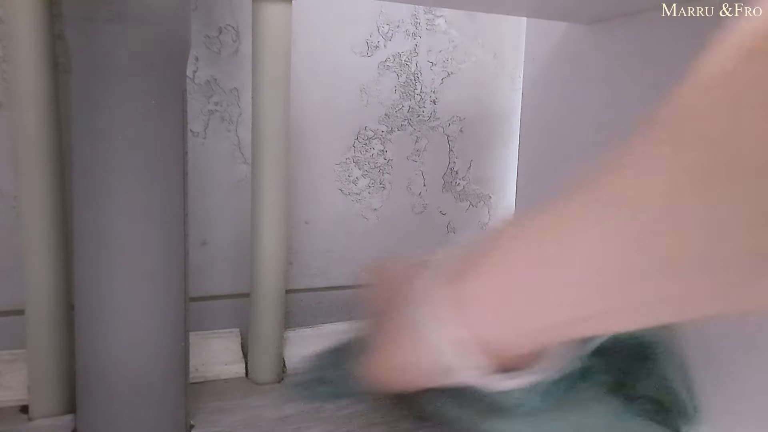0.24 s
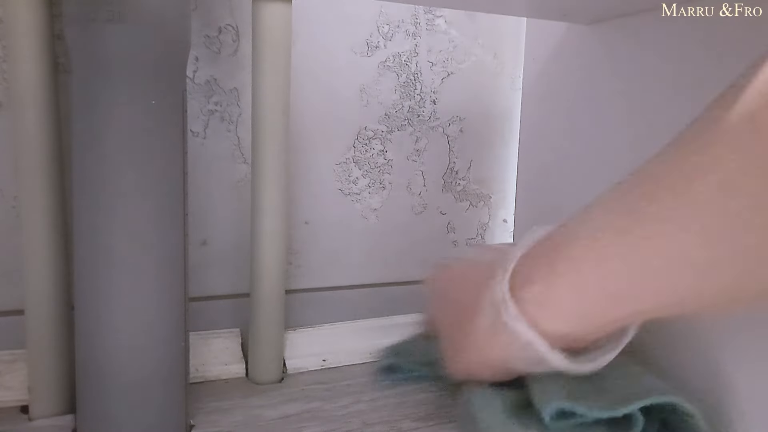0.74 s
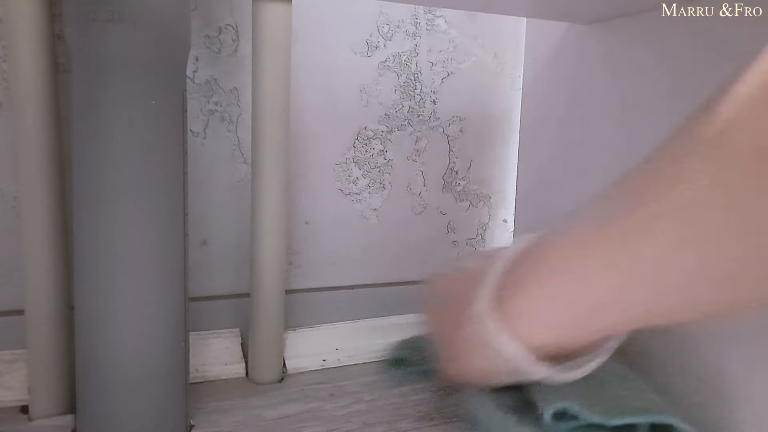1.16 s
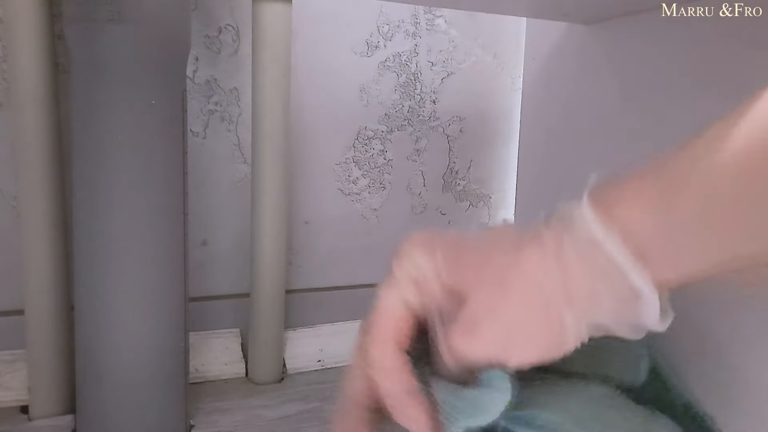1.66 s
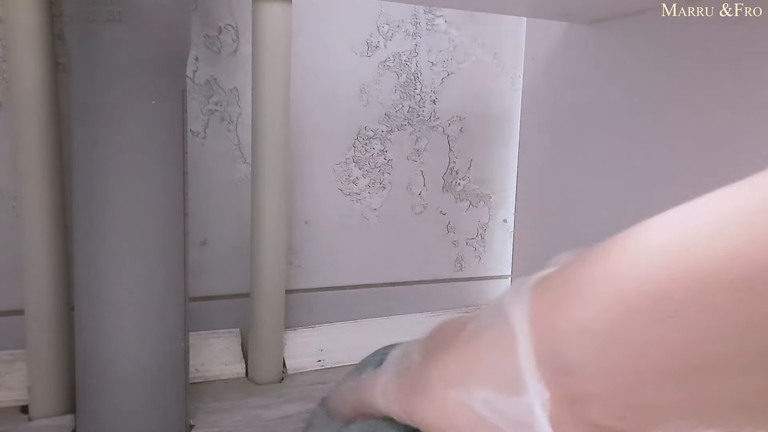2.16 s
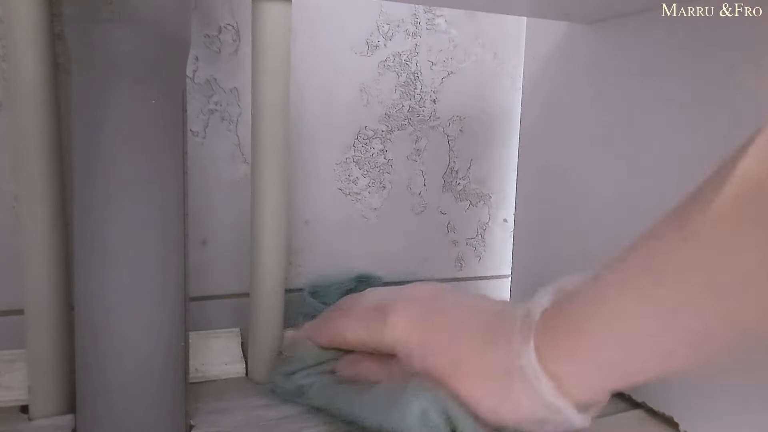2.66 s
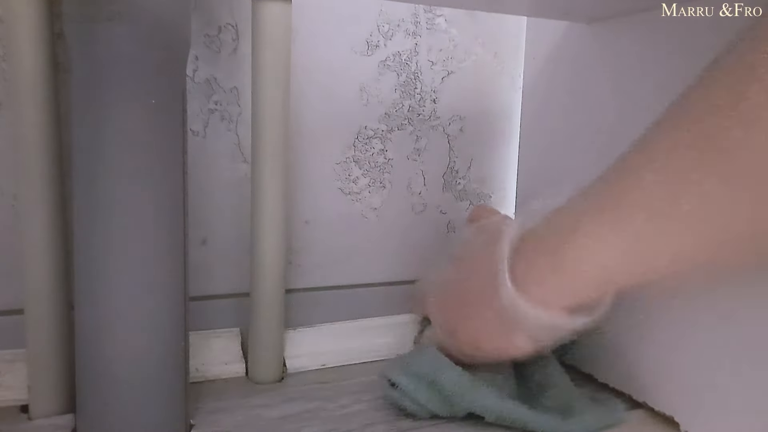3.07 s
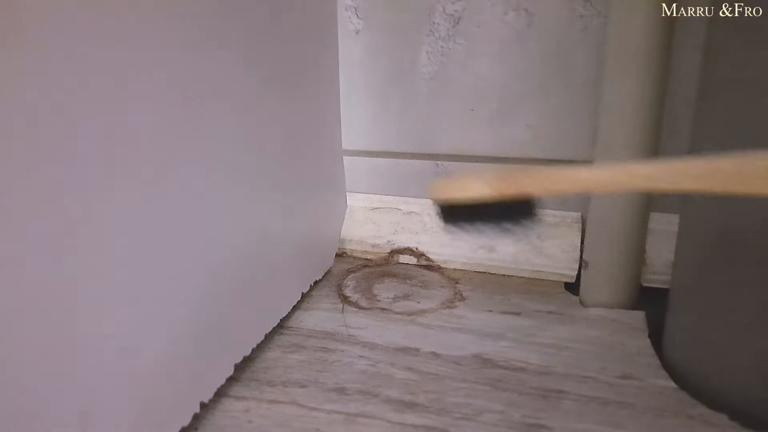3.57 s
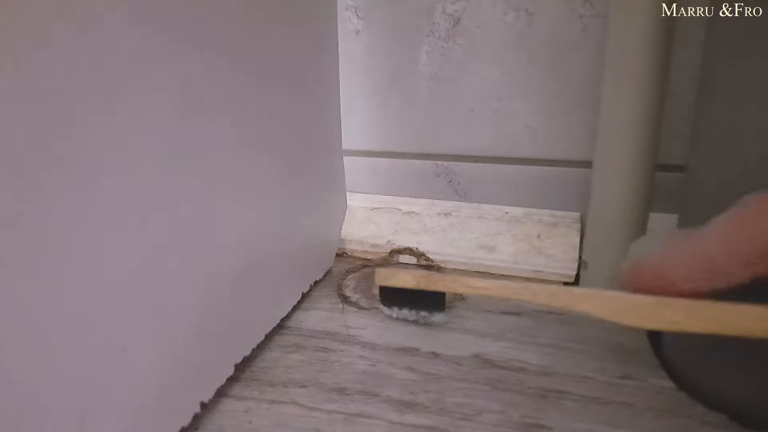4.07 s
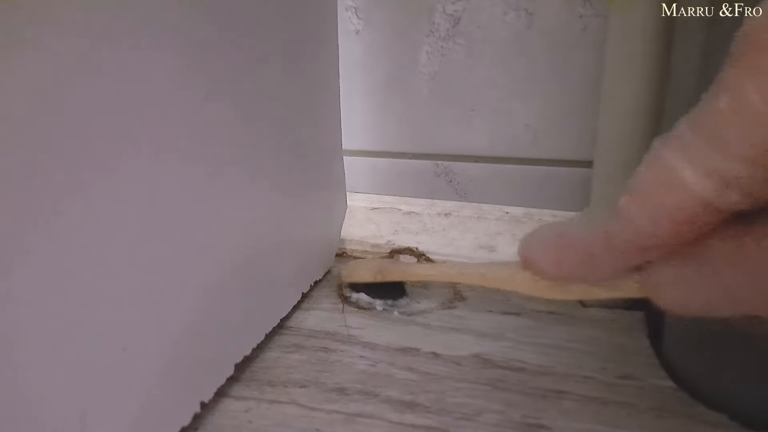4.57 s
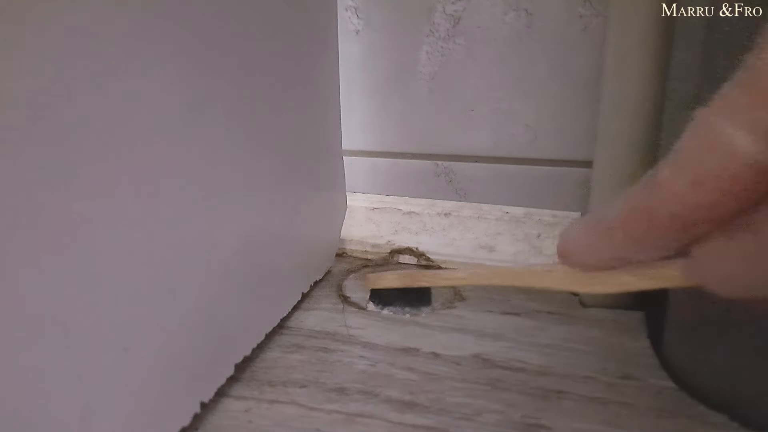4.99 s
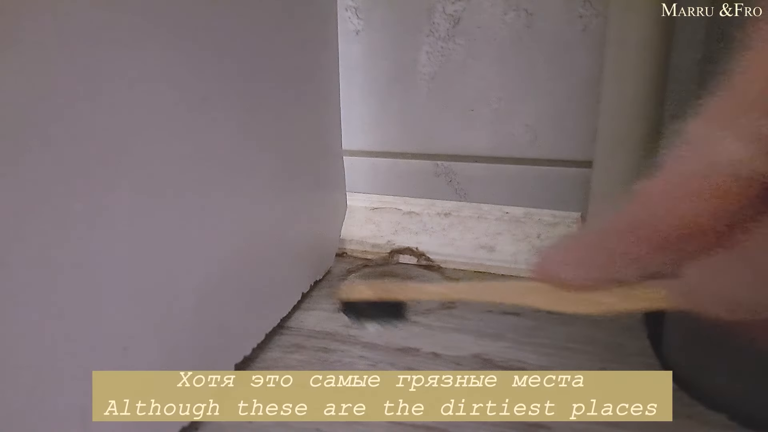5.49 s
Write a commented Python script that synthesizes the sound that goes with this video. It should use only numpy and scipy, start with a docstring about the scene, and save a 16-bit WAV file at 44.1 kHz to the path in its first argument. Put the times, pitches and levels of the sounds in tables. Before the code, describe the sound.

A cloth rubs the floor in uneven strokes with hollow board thumps, then a small brush scrubs scratchily, faster and harder.

```python
"""Friction and impact on a bathroom floor

A gloved hand wipes the floor with a cloth in a narrow corner and bumps the hollow boards.
After an abrupt change of scene a toothbrush settles on the grime at the floor's edge and scrubs, faster and harder.
Friction is random tiny slips of fibres and bristles, coloured by filters or exciting resonances of the floor.
Blows ring decaying board modes over a dull thud; short echoes from close walls scatter the treble."""
import sys
import numpy as np
from scipy import signal
from scipy.fft import rfft, irfft, next_fast_len
from scipy.io import wavfile
from scipy.ndimage import uniform_filter1d, map_coordinates

SR = 44100
rng = np.random.default_rng(int(sys.argv[2]) if len(sys.argv) > 2 else 0)


def unload_wav(signal):
    """Save mono or channel-first audio to the path in sys.argv[1] as 16-bit WAV at rate SR, clipped to [-1, 1]."""
    wavfile.write(
        sys.argv[1],
        SR,
        np.round(np.clip(np.atleast_2d(signal).T, -1, 1) * 32767).astype(np.int16),
    )


N = 252693  # length in samples
# Zero-padded transform length in samples, and its frequencies in Hz
SIZE = next_fast_len(N + SR // 4, real=True)
HZ = np.fft.rfftfreq(SIZE, 1 / SR)

# All levels in the tables are relative: each layer is balanced again where it is mixed.
# Noise of the quiet room. Each row: frequency in Hz, spectral level in dB per Hz.
ROOM_SPECTRUM = [(25, 0), (80, 0), (220, -4), (330, 2), (560, -3), (900, -14), (1500, -14), (2800, -20),
                 (8000, -17), (9300, -22), (15000, -17)]
# Likeness of the two ears. Each row: frequency in Hz, correlation from 0 to 1.
EAR_LIKENESS = [(150, 0.92), (380, 0.82), (700, 0.44), (1400, 0.4), (3000, 0.015), (12000, 0.0215)]
# Lean of the friction treble, mostly left. Each row: frequency in Hz, left-right difference in dB.
TREBLE_LEAN = [(1500, 1), (4000, 2), (7000, -1), (9500, 5.5), (15000, 2.5)]

# Bumps on the boards. Each row: start in seconds, blow in dB, boom in dB, knock in dB, rise in seconds.
BUMP_EVENTS = [(0.142, -16, -18.5, -9, 0.0026), (0.252, -25.5, -15, -4, 0.0056),
               (0.395, -24.5, -16, -11.5, 0.0033), (0.526, -9, -12, -13, 0.0033),
               (0.959, -2, -10, -13, 0.001), (1.425, -13, -12, -5.5, 0.021), (1.575, -20.5, -14, -18, .002),
               (1.787, -12, -12.5, -1, 0.013), (2.2, -27.5, -5, -1, .008), (2.422, -24, -18, -2, 0.0031),
               (2.51, -22.5, -8.5, -17, 0.0038), (2.792, -27.5, -5, -10, 0.0058),
               (2.85, -17, -7.5, -11.5, 0.0045), (3.114, -17.5, -31, -6, .004),
               (3.145, -18.5, -10, -18, 0.007), (3.579, -38, -33, -25, .002), (3.888, -26, -14, -8, 0.0056),
               (3.943, -31, -7, -12, 0.0044), (4.237, -19, -28, -13, 0.022), (4.755, -10, -17, -16, 0.0011)]
# Modes of the hollow boards. Each row: frequency in Hz, level in dB, undamped 60 dB decay in seconds.
BOARD_MODES = [(77.2, -23.5, 0.72), (123.6, -1.5, 0.46), (167.1, 1.5, 0.26), (192.2, -5, 0.17),
               (292, -7.5, 0.075), (329, -17.5, 0.068), (374.6, 3, 0.21), (428, -17, 0.084),
               (488.6, -12.5, 0.16), (559, -19, 0.079), (726, -21, 0.16), (1050, -37, 0.17)]
# Dull push of a padded blow. Each row: frequency in Hz, spectral level in dB per Hz.
THUD_SPECTRUM = [(20, -13), (55, -12), (110, 2), (250, -5), (480, -0.5), (750, -21.5), (1500, -49),
                 (4000, -64)]
# Sharp snaps of glove and grit. Each row: start in seconds, crack in dB, clack relative to the crack in dB.
SNAP_EVENTS = [(0.1407, -21.5, -5), (0.2515, -26, 0), (0.9226, -37.5, 18.5), (0.9605, -26, 9),
               (1.5774, -37, 9.5), (1.7744, -17.5, -26), (2.499, -22.5, -26), (2.823, -30, 16.5),
               (2.845, -17, 0.5), (3.6403, -52, -9.5)]
# Rakes of fibres or bristles over a crust of grime.
# Each row: centre in seconds, half length in seconds, centre frequency in Hz, level in dB.
RAKE_EVENTS = [(1.582, 0.025, 13400, -42), (2.269, 0.014, 5800, -38.5), (2.449, 0.081, 5700, -42.5),
               (2.505, 0.023, 13400, -31), (4.362, 0.032, 11700, -32), (4.727, 0.03, 3080, -40),
               (5.036, 0.024, 4000, -45)]

# Strokes of the cloth. Each row: start in seconds, hardest push in seconds, end in seconds,
# fibre hiss in dB, drag on the floor in dB, rasp on the skirting in dB.
WIPE_STROKES = [(0.008, 0.086, 0.29, -49.5, -45, -42.5), (0.065, 0.173, 0.36, -42.5, -40.5, -37),
                (0.409, 0.523, 0.61, -43.5, -38.5, -30.5), (0.612, 0.741, 0.9, -47.5, -50, -43),
                (0.89, 0.938, 1.05, -45, -42, -30), (0.987, 1.135, 1.278, -44, -42.5, -38),
                (1.294, 1.482, 1.6, -49.5, -46, -64), (1.5, 1.596, 1.71, -55, -51.5, -49.5),
                (1.702, 1.805, 1.94, -46.5, -52, -41), (1.758, 1.869, 2.18, -54, -57.5, -45),
                (1.922, 2.09, 2.39, -46.5, -56, -53), (2.067, 2.195, 2.4, -47, -44, -58),
                (2.314, 2.537, 2.68, -48, -44, -48.5), (2.586, 2.766, 3.18, -52, -71, -52.5),
                (2.771, 2.827, 2.924, -45, -45, -30), (2.886, 2.99, 3.2, -55, -52.5, -64),
                (3.052, 3.104, 3.22, -40, -45.5, -31.5)]
# Pulls of the bunched cloth under the palm. Each row: start in seconds, hardest pull in seconds,
# end in seconds, level in dB, pitch ratio.
CLOTH_PULLS = [(1.64, 1.82, 2.2, -39, 1.04), (1.874, 2.067, 2.3, -48, 0.99), (2.1, 2.21, 2.28, -52.5, 0.8),
               (3.048, 3.127, 3.2, -24, 0.92)]
# Strokes of the toothbrush, each lasting until the next turn. Each row: turn in seconds,
# hardest press as a share of the stroke, bristle hiss in dB, drag on the floor in dB.
BRUSH_STROKES = [(3.87, 0.43, -56.5, -45.5), (3.978, 0.45, -50.5, -41.5), (4.207, 0.65, -43, -38.5),
                 (4.497, 0.65, -52, -38), (4.62, 0.42, -44, -36), (4.781, 0.71, -46, -32),
                 (4.935, 0.4, -46.5, -38), (5.075, 0.67, -45, -29.5), (5.226, 0.75, -43, -30),
                 (5.361, 0.59, -43.5, -29.5), (5.504, 0.75, -44.5, -32.5), (5.641, 0.68, -43, -30)]
# Hiss that remains even at a turn, most while the brush settles.
# Each row: time in seconds, share of the stroke's hiss gain that is added.
TURN_HISS = [(4.2, 0.27), (4.5, 0.058)]

# Colours of the friction noise. Each row: frequency in Hz, spectral level in dB per Hz.
FIBRE_SPECTRUM = [(200, -18), (700, -4), (1500, -2.5), (2900, -2.5), (5500, 2), (8300, 4), (9200, -8),
                  (12500, 1), (15800, -5)]
BRISTLE_SPECTRUM = [(300, -12), (900, -12), (2000, -3.5), (3500, -1), (6000, -0.5), (8200, 3.5), (9200, -9),
                    (12500, -2), (15800, -7.5)]

# Resonances under a sliding load: floor under cloth, brush and bearing hand, skirting, bunched cloth
# (before its pitch ratio), brush head.
# Each row: frequency in Hz, width in Hz, level in dB, left-right difference in dB.
CLOTH_FLOOR_MODES = [(78, 29, -14, 4), (126.5, 25, -5.5, 0), (167.4, 20.3, 0.5, 0.5), (305, 52, -9.5, 8),
                     (347.5, 65, -5, 2.5), (497, 86, -11, 12.5), (561, 200, -14, 7.5)]
BRUSH_FLOOR_MODES = [(160, 15.7, 0, -1.7), (197.5, 20, -6.5, 6), (267, 38.5, -4, -1.5),
                     (335.3, 36.6, 3, -1), (362.6, 44.6, 1, 1.7)]
HAND_FLOOR_MODES = [(76, 9, 4, 1), (126, 20, -6, 1), (185, 50, -9, 0), (260, 50, -12, 0)]
SKIRTING_MODES = [(467, 206, -7.5, 5.5), (706, 89, -8, -5), (891, 98, -2, 0.5), (1118, 63, -6.5, -13),
                  (1347, 81, 2, -4.5), (1872, 101, -4, 6.5), (2187, 180, -8, 5), (3840, 1000, -20.5, -9)]
BUNCH_MODES = [(449, 157, 0, 5.5), (534, 128, 3.5, 6.5), (638, 214, -8, 4.5)]
BRUSH_HEAD_MODES = [(554.8, 19.5, 2.5, 19.2), (625, 100, 1, 11), (736, 61, -2.5, 8.1), (783, 45, -2.5, 8.4),
                    (953, 120, -14, 0.9), (1135, 29, -11, 2.6), (1725, 234, -12.5, 2.7)]

# Growth of each sound with the push of the hand.
# Each row: loss at either end of a stroke in dB, roundness (1 pointed, 2 domed).
HISS_SHAPE = (16.1, 1.59)
DRAG_SHAPE = (17.6, 1.52)
RASP_SHAPE = (26.8, 1.186)
PULL_SHAPE = (27.5, 1.37)
PRESS_SHAPE = (13.4, 1.27)

HISS_POWER = 1.1  # exponent of bristle speed
SCENE_CHANGE_S, LAST_TURN_S = 3.24, 5.78
BEARING_S, BEARING_DB = 4.76, -27  # crest of the rumble under the brush hand
BEARING_RISE_DB_PER_S, BEARING_FALL_DB_PER_S = 260, 107
DAMPING_DB = 28.5  # a blow weaker by this much rings half as long, under a light hand on the boards
TOP_HZ = 16050  # upper band limit


def amp(db):
    """Level and amplitude: decibels become a linear gain."""
    return 10 ** (np.asarray(db) / 20)


def unit(x):
    """Normalisation: a signal is scaled to rms 1."""
    return x / np.sqrt(np.mean(x ** 2) + 1e-20)


def along(points, hz):
    """Interpolation: (Hz, value) points are read on a logarithmic frequency axis."""
    f, v = np.transpose(points)
    return np.interp(np.log(hz + 1), np.log(f + 1), v)


def pan(db):
    """Interaural level difference: it is shared equally between left and right gains."""
    return amp(np.array([[1], [-1]]) * db / 2)


def filtered(x, response):
    """Linear filtering: the spectrum is multiplied by a response of frequency."""
    return irfft(rfft(x, SIZE) * response(HZ), SIZE)[..., :N]


def coloured(x, spectrum):
    """Spectral shaping: friction noise receives its colour and its lean between the ears."""
    return filtered(x, lambda hz: amp(along(spectrum, hz)) * pan(along(TREBLE_LEAN, hz)))


def resonate(x, modes):
    """Modal response: parallel resonances of alternating polarity, each placed between the ears."""
    centre, width, db, side = np.transpose(modes)
    gains = (-1) ** np.arange(len(centre)) * amp(db) * pan(side)

    def response(hz):
        detuning = (hz * hz - centre[:, None] ** 2) / ((hz + 1e-6) * width[:, None])
        return gains @ (1 / (1 + 1j * detuning))

    return filtered(x, response)


def add(track, s, sound):
    """Superposition: a sound is summed into a track at time s in seconds."""
    start = round(s * SR)
    track[start:start + len(sound)] += sound[:N - start]


def ears(pair, lead_s=.00011):
    """Interaural coherence: bass is alike at both ears, left leading; treble differs between them."""
    turn = np.arccos(np.clip(along(EAR_LIKENESS, HZ), -1, 1)) / 2
    mid, side = rfft(pair, SIZE) * [np.cos(turn), np.sin(turn)]
    # half the lead advances the left ear, half delays the right
    lead = np.exp(1j * np.pi * HZ * lead_s)
    return irfft([(mid + side) * lead, (mid - side) / lead], SIZE)[:, :N]


def slips(rate, spread_db):
    """Stick-slip: random tiny slips, rate a second on average, of varying size, reach both ears."""
    happens = rng.random(N) < rate / SR
    sizes = happens * amp(spread_db * np.clip(rng.standard_normal(N), -2, 2))
    return unit(ears(sizes * rng.standard_normal((2, N))))


def catching(rate, depth_db):
    """Uneven grip: a smooth random gain passes rate knots a second."""
    knots = rng.standard_normal(int(N * rate / SR) + 4)
    wander = map_coordinates(knots, [np.arange(N) * rate / SR])
    return unit(amp(depth_db * wander))


def shifting(x, depth_db):
    """Changing contact: the colour of the friction drifts as the contact moves over new ground."""
    z = signal.stft(x, nperseg=512)[2]
    field = rng.standard_normal(z.shape)
    field = uniform_filter1d(field, size=5, axis=1)  # across frequency
    field = uniform_filter1d(field, size=12, axis=2)  # across time
    return signal.istft(z * amp(depth_db * unit(field)), nperseg=512)[1][:, :N]


def swell(start, crest, end, shape):
    """Envelope of a push: gain builds to its crest, eases off and dies away beyond both ends."""
    depth_db, roundness = shape
    t = np.arange(N) / SR
    before = (crest - t) / max(crest - start, .01)
    after = (t - crest) / max(end - crest, .01)
    away = np.maximum(before, after)  # 0 at the crest, 1 at either end
    near = away < 2
    gain = np.zeros(N)
    gain[near] = amp(-depth_db * away[near] ** roundness)
    return gain


def room_tone():
    """Stationary background: faint steady noise of the bathroom, shaped in frequency."""
    air = unit(filtered(ears(rng.standard_normal((2, N))), lambda hz: amp(along(ROOM_SPECTRUM, hz))))
    return amp(-61.5) * air


def corner(x, wall_db=-18, lowest_hz=700, count=7):
    """Early reflection: a few weak treble echoes from the close walls, different at each ear."""
    walls = np.zeros((2, SR // 50))
    for ear in walls:
        delays = rng.integers(SR // 1000, len(ear), count)  # 1 to 20 ms, in samples
        ear[delays] = amp(wall_db) * rng.choice([-1, 1], count)
    return filtered(x, lambda hz: 1 + rfft(walls, SIZE) * hz ** 2 / (hz ** 2 + lowest_hz ** 2))


def bumps(detune=0.058, thud_t60=0.17):
    """Modal impact: soft blows thud and ring the boards; the contact weighs deep boom against knock."""
    track, pushes, t = np.zeros(N), np.zeros(N), np.arange(SR // 2) / SR
    hz, db, t60 = np.transpose(BOARD_MODES)[:, :, None]
    polarity = (-1) ** np.arange(len(hz))[:, None]
    for s, peak_db, boom_db, knock_db, rise_s in BUMP_EVENTS:
        free = 2 ** (peak_db / DAMPING_DB)
        fading = polarity * amp(db - 60 * t / (t60 * free))
        contact_db = np.where(hz < 240, boom_db, knock_db)
        pitch_chance, level_chance = rng.standard_normal((2, *hz.shape))
        # the hand that damps the boards also shifts their pitch
        pitch = hz * (1 + detune * pitch_chance * (1 - free))
        ring = fading * amp(contact_db + 3.0 * level_chance) * np.sin(2 * np.pi * pitch * t)
        blow = amp(peak_db) * (1 - np.exp(-t / max(rise_s, 1 / SR)))
        add(track, s, blow * ring.sum(0))
        add(pushes, s, blow * amp(-60 * t / thud_t60))
    thud = pushes * unit(filtered(rng.standard_normal(N), lambda f: amp(along(THUD_SPECTRUM, f))))
    boards = amp(-1.5) * track + amp(-12) * thud
    return ears(np.array([boards, np.zeros(N)]), lead_s=.00033) * pan(2.6)


def snaps():
    """Impulsive contact: each snap is a brief noise crack that also clacks against the skirting."""
    cracks, clacks, t = np.zeros(N), np.zeros(N), np.arange(SR // 8) / SR
    rise = 1 - np.exp(-t / .0012)
    for s, peak_db, clack_db in SNAP_EVENTS:
        add(cracks, s, rise * amp(peak_db - 60 * t / 0.048))
        add(clacks, s, rise * amp(peak_db + clack_db - 60 * t / 0.054))
    crack = unit(coloured(ears(rng.standard_normal((2, N))), FIBRE_SPECTRUM))
    clack = unit(resonate(ears(rng.standard_normal((2, N))), SKIRTING_MODES))
    return amp(-1.5) * cracks * crack + amp(-6.0) * clacks * clack


def rakes(width_octaves=1.0, spread_db=3):
    """Band-limited friction: each rake is a short swell of gritty hiss around its own pitch."""
    track, t = np.zeros((2, N)), np.arange(-SR // 8, SR // 8) / SR
    hz = np.fft.rfftfreq(len(t), 1 / SR) + 1
    for s, half, centre_hz, db in RAKE_EVENTS:
        grit = rng.standard_normal((2, len(t))) * amp(spread_db * rng.standard_normal(len(t)))
        band = np.exp(-(np.log2(hz / centre_hz) / width_octaves) ** 2) * pan(along(TREBLE_LEAN, hz))
        hiss = unit(irfft(rfft(grit) * band, len(t)))
        rake = amp(db) * np.exp(-(t / half) ** 2) * hiss
        for ear, sound in zip(track, rake):
            add(ear, s + t[0], sound)
    return track


def wiping_levels():
    """Load-dependent friction: hiss, drag and rasp follow each push, the rasp most steeply."""
    hiss, drag, rasp = np.zeros((3, N))
    for start, crest, end, hiss_db, drag_db, rasp_db in WIPE_STROKES:
        hiss = np.maximum(hiss, amp(hiss_db) * swell(start, crest, end, HISS_SHAPE))
        drag = np.maximum(drag, amp(drag_db) * swell(start, crest, end, DRAG_SHAPE))
        rasp = np.maximum(rasp, amp(rasp_db) * swell(start, crest, end, RASP_SHAPE))
    return hiss, drag, rasp


def pulls(sticking):
    """Cavity resonance: each pull of the bunched cloth rubs hollowly at its own pitch."""
    track = np.zeros((2, N))
    for start, crest, end, db, ratio in CLOTH_PULLS:
        hollow = np.array(BUNCH_MODES) * [ratio, 1, 1, 1]
        track += amp(db) * swell(start, crest, end, PULL_SHAPE) * unit(resonate(sticking, hollow))
    return track


def cloth():
    """Sliding friction: fibres hiss, the hand's weight drags on the floor, shoves rasp the skirting."""
    sliding, weight, shove = wiping_levels()
    grip = catching(rate=100, depth_db=0.94)
    fibres = coloured(slips(rate=9000, spread_db=0.5), FIBRE_SPECTRUM)
    hiss = sliding * unit(shifting(fibres, depth_db=2))
    sticking = slips(rate=900, spread_db=2)
    drag = weight * unit(resonate(sticking, CLOTH_FLOOR_MODES))
    pull = pulls(sticking)
    scraping = resonate(slips(rate=600, spread_db=2.0), SKIRTING_MODES)
    rasp = shove * unit(shifting(scraping, depth_db=3.5))
    return grip * (amp(4.0) * hiss + amp(3.5) * drag + amp(-2) * pull + amp(2.5) * rasp)


def brushing_levels():
    """Reciprocating motion: hiss follows the speed of the bristles, force the pressure of the hand."""
    t = np.arange(N) / SR
    hiss, force = np.zeros((2, N))
    ends = [stroke[0] for stroke in BRUSH_STROKES[1:]] + [LAST_TURN_S]
    for (start, press_at, hiss_db, drag_db), end in zip(BRUSH_STROKES, ends):
        moving = (t >= start) & (t < end)
        # fastest mid-stroke, zero at each turn
        speed = np.abs(np.sin(np.pi * (t[moving] - start) / (end - start)))
        remaining = np.interp(t[moving], *np.transpose(TURN_HISS))
        hiss[moving] = amp(hiss_db) * (speed ** HISS_POWER + remaining)
        crest = start + press_at * (end - start)
        force = np.maximum(force, amp(drag_db) * swell(start, crest, end, PRESS_SHAPE))
    return hiss, force


def bearing_down():
    """Transient load: the gain of the floor's rumble builds quickly under the hand and fades more slowly."""
    since = np.arange(N) / SR - BEARING_S
    return amp(BEARING_DB + np.minimum(BEARING_RISE_DB_PER_S * since, -BEARING_FALL_DB_PER_S * since))


def toothbrush(firm_db=-35, chatter_growth=0.31):
    """Stick-slip of bristles: they flick over grime, and tufts shake the floor and the brush head."""
    sweep, force = brushing_levels()
    flicks = coloured(slips(rate=14000, spread_db=0.0), BRISTLE_SPECTRUM)
    hiss = sweep * unit(shifting(flicks, depth_db=1.8))
    tufts = slips(rate=900, spread_db=2)
    drag = force * unit(resonate(tufts, BRUSH_FLOOR_MODES))
    # the harder the stroke, the more the head chatters
    chatter_gain = force * (force / amp(firm_db)) ** chatter_growth
    chatter = chatter_gain * unit(shifting(resonate(tufts, BRUSH_HEAD_MODES), depth_db=2.5))
    rumble = bearing_down() * unit(resonate(tufts, HAND_FLOOR_MODES))
    return amp(2.0) * hiss + drag + amp(-1.0) * chatter + rumble


def scene():
    """Superposition of sources: wiping stops dead at the change of scene, and brushing follows."""
    t = np.arange(N) / SR
    contacts = bumps() + snaps() + rakes()
    wiping = (cloth() + contacts) * (t < SCENE_CHANGE_S)
    # contacts stay silent for 0.3 s after the change
    brush_contacts = contacts * (t > SCENE_CHANGE_S + .3)
    return corner(wiping + toothbrush() + brush_contacts) + room_tone()


def record(dry, low_cut_hz=42):
    """Band limitation: the deepest bass is thinned and nothing is kept above the upper limit."""
    thinned = signal.sosfilt(signal.butter(2, low_cut_hz, "highpass", fs=SR, output="sos"), dry)
    return filtered(thinned, lambda hz: hz < TOP_HZ)


dry = scene()
out = record(dry)
unload_wav(out)
```